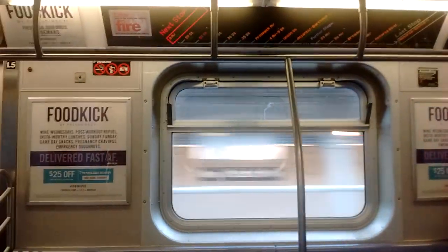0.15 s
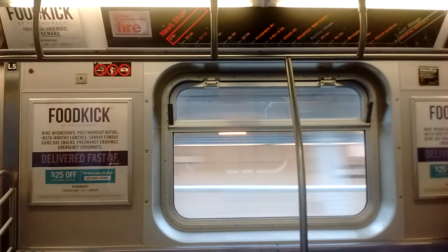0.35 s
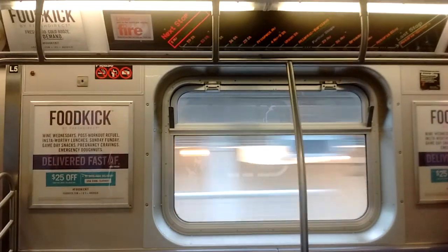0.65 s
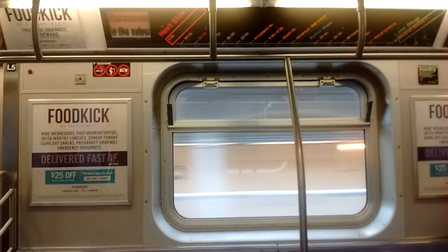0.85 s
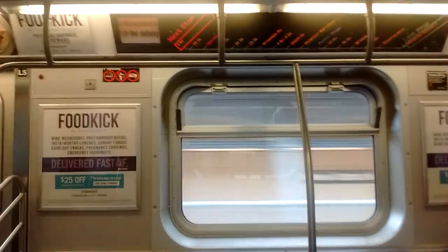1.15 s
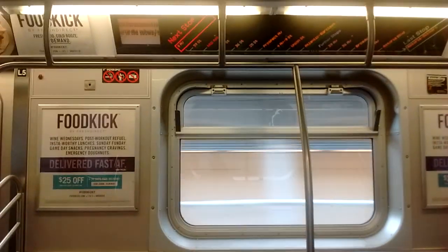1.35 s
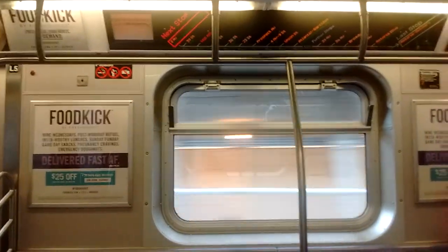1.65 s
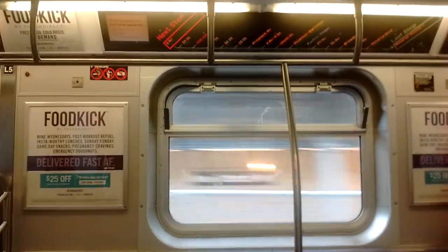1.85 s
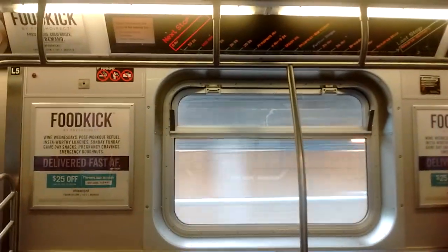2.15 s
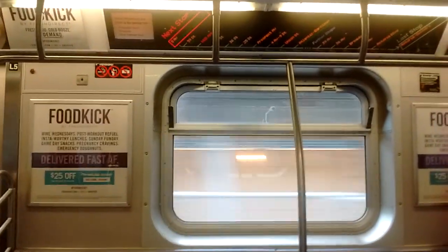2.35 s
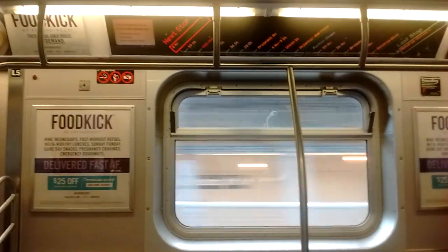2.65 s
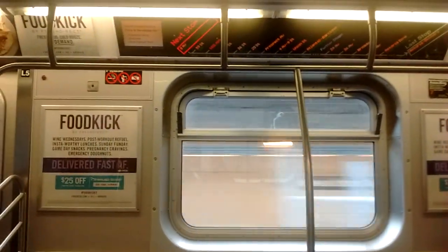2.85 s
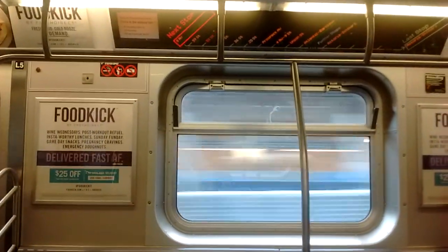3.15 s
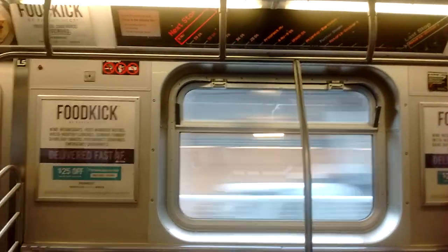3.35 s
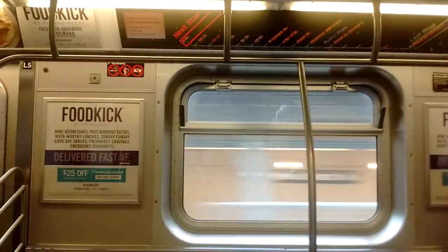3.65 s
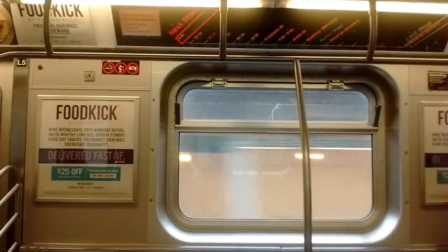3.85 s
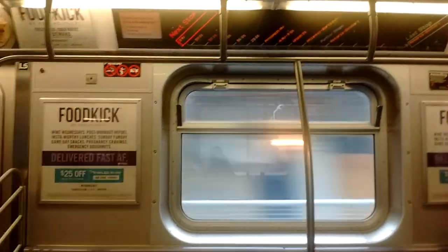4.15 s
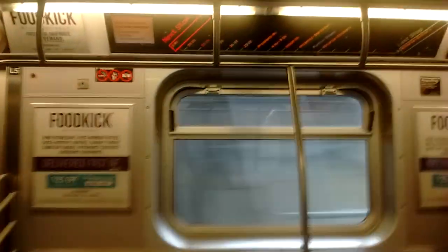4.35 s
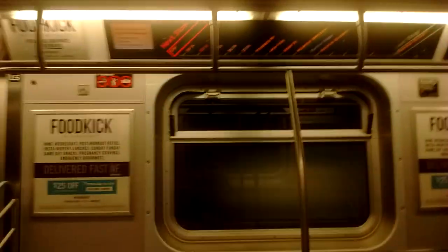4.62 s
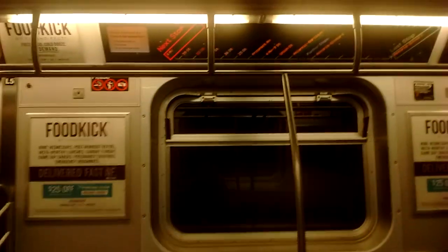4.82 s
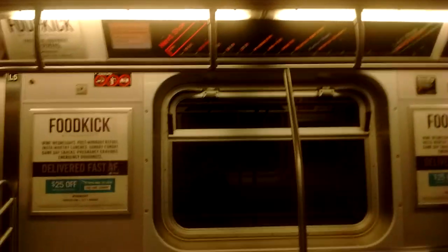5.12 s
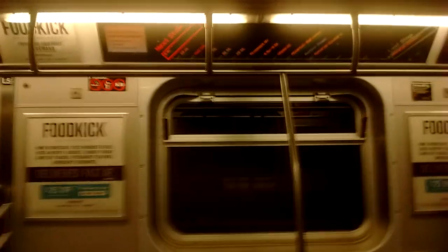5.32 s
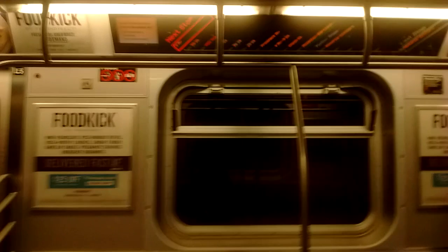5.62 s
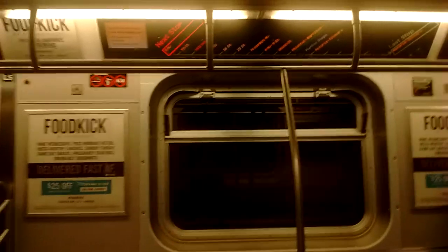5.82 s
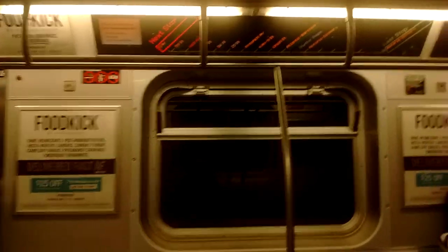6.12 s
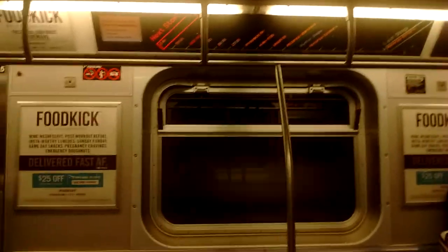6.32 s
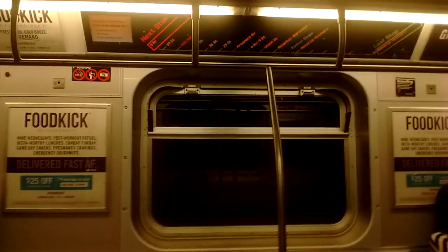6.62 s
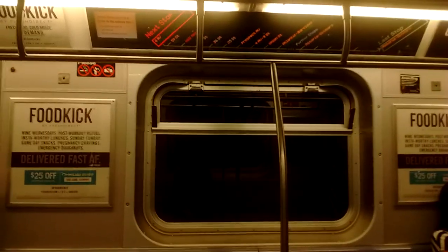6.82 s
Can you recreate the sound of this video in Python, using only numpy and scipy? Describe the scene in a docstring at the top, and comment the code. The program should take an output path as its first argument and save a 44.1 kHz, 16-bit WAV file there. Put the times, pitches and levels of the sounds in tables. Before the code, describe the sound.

Inside a fast subway car, deep floor rumble and broad wheel roar run without pause, with air hissing past the door seals. A low motor hum pulses early, then fades. Faint steel scrapes, a chirp and one tiny thin squeal pass. After the station, the tunnel walls close in and the roar grows brighter and rougher, with rapid puffs at rail joints. Handheld stereo microphone inside the cabin.

```python
"""Inside a fast subway car

The car runs past a station, then the tunnel walls close in.
Shaped noise makes the wheel roar, floor rumble, panel drone, wall echo and rushing air; the motor hums.
Noise bursts puff at rail joints, bands of noise chirp, swell and sing, gritty noise scrapes, one tone squeals.
Two microphone ports each also hear the other side late; the right channel is inverted."""
import sys
import numpy as np
from scipy import signal
from scipy.fft import rfft, irfft, next_fast_len
from scipy.io import wavfile

SR = 44100
rng = np.random.default_rng(int(sys.argv[2]) if len(sys.argv) > 2 else 0)


def wrap_up_sound(samples):
    """Save the sound to the file named by the first command line argument, as 16-bit audio."""
    columns = np.atleast_2d(samples).T
    # keep every value between -1 and 1, then stretch to whole-number steps
    tamed = np.clip(columns, -1, 1)
    steps = np.round(tamed * 32767).astype(np.int16)
    wavfile.write(sys.argv[1], SR, steps)


def makeup_ratio(level_db):
    """Linear amplitude ratio for a level in decibels (20 dB per factor of ten)."""
    decades = np.asarray(level_db, float) / 20
    return 10 ** decades


N = 307818
SIZE = next_fast_len(N)
HZ = np.maximum(np.fft.rfftfreq(SIZE, 1 / SR), 1)
T = np.arange(N) / SR

# Noise colours; only the shape counts, each layer gets its own level: pitch_hz, level_db_per_hz
ROAR_COLOUR = [(940, 1.5), (1200, -1), (1600, -3), (2000, -3), (2500, -6), (3000, -6), (3600, -10.5),
               (5000, -29), (7000, -32.5)]
RUMBLE_COLOUR = [(22, -31), (31, -20), (41, -1.5), (53, -21), (65, -8), (77, -10), (88, 0.5), (110, -5.5),
                 (121, -3.5), (160, -5), (200, -8), (230, -6.5), (290, -8), (340, -15.5)]
DRONE_COLOUR = [(320, 3), (410, 2.5), (520, 0), (600, -2.5), (780, -7), (900, -7), (960, -23)]
WALL_COLOUR = [(1900, -35), (2400, 6.5), (2800, 6.5), (3300, -6), (4200, -21), (6000, -6)]
RUSH_COLOUR = [(3000, -13), (3500, -1), (3900, 2.5), (4600, -4), (5300, -12.5), (6500, -12), (7000, -13.5)]
SIZZLE_COLOUR = [(7000, 4), (8000, 3), (9200, -1), (10500, -6), (12500, -14.5), (15500, -21)]
# How hard the wheels roll, as roar level before the dips: time_s, level_db
ROLLING_LEVEL = [(0, -31), (.5, -32), (.65, -28.5), (.95, -33), (1.4, -31), (1.9, -30), (2.45, -30.5),
                 (3.0, -31.5), (3.7, -31.5), (3.95, -30.5), (4.4, -30), (4.8, -28.5), (5.1, -30),
                 (5.5, -28.5), (6.2, -28), (6.98, -29)]
# Air past the door seals, as rush level before the dips: time_s, level_db
AIRFLOW_LEVEL = [(0, -41), (.45, -41.5), (.75, -38), (1.0, -38), (1.4, -38.5), (1.95, -40.5), (2.3, -39),
                 (2.95, -41), (3.35, -39.5), (3.7, -40), (4.2, -35.5), (4.6, -39.5), (4.9, -41.5),
                 (5.3, -45.5), (5.7, -43.5), (6.12, -42.5), (6.7, -46), (6.98, -43.5)]
# Roar and rush dip briefly together: middle_s, depth_db
LEVEL_DIPS = [(1.57, 2.5), (2.08, 4), (2.66, 2), (3.3, 1), (5.0, 2), (5.78, 1), (6.62, 0.5)]
# How close the tunnel walls are: time_s, closeness (0 open to 1 close)
WALL_CLOSENESS = [(0, 0.053), (4.45, 0.099), (4.75, 0.88), (5.3, 0.8), (6.98, 0.96)]
# Wheel resonance singing in the roar, before its flutter: time_s, level_db
SINGING_LEVEL = [(0, -36), (1.4, -35), (2.4, -34), (3.5, -38), (3.85, -34), (4.3, -29.5), (4.6, -32.5),
                 (4.88, -27), (5.1, -31.5), (5.3, -37), (5.47, -26.5), (5.7, -29.5), (5.82, -35),
                 (5.95, -30), (6.4, -28), (6.6, -38), (6.85, -39), (6.98, -27)]
# Wheels over joints and gaps; the bell is set before a tilt to the bass:
# start_s, peak_level_db, bell_middle_hz, bell_width_octaves, fall_by_60_db_s
JOINT_PUFFS = [(.45, -40, 5000, 1.5, 0.46), (2.58, -35.5, 3480, 1.8, 0.2), (3.76, -28, 1300, 2.8, 1.02),
               (3.83, -50, 7000, 1.5, .25), (4.15, -46.5, 6500, 2, 0.36), (5.29, -32, 1700, 1.8, .4),
               (5.39, -30.5, 1800, 1.6, 0.44), (5.49, -29, 1510, 2.1, 0.35), (5.63, -31, 1705, 1.8, .2),
               (5.76, -24.5, 1920, 1.4, .12), (5.805, -31, 1900, .7, 0.22), (5.855, -34, 1950, 0.76, 0.15),
               (5.94, -32, 1500, 2.1, 0.37), (6.111, -27.5, 1760, 1.6, 0.36), (6.4, -37, 1690, 2.6, .3),
               (6.83, -27.5, 2200, 1.7, 0.3), (6.92, -32, 1800, 1.5, .4)]
# Bands of noise: short chirps, slow swells of the air rush, a rising surge; None means no glide:
# middle_s, half_length_s, pitch_hz, width_hz, peak_level_db, glide_hz_per_s
NOISE_BANDS = [(.5, .04, 9500, 900, -58, None), (0.85, 0.058, 3830, 720, -32, -300),
               (0.86, .045, 7550, 120, -64, None), (1.13, .06, 6440, 500, -45, 1498),
               (3.81, 0.599, 4520, 760, -44.5, None), (0.42, 0.65, 3680, 400, -42.5, None),
               (4.13, 0.53, 6500, 900, -50, None), (6.11, 0.045, 8100, 400, -53, None),
               (3.79, .04, 980, 160, -28.5, 3500.5), (3.87, 0.082, 1450, 850, -28.5, 1500.5),
               (3.845, .055, 770, 200, -27, 299.5)]
# Scrapes of steel on steel, before their grit: middle_s, half_length_s, peak_level_db
STEEL_SCRAPES = [(.49, 0.032, -57), (.62, 0.11, -59), (.79, .04, -54), (0.866, 0.052, -47), (.96, .05, -52),
                 (1.06, .04, -53), (1.139, 0.05, -51), (1.269, .05, -56), (3.98, .1, -58), (4.2, .08, -56),
                 (4.4, .12, -59)]
# Motor hum, before flutter and side balance: time_s, level_db
HUM_LEVEL = [(0, -31), (.1, -15), (.25, -22), (.36, -43), (.6, -38), (.68, -16), (.82, -28), (.92, -16),
             (1.1, -27), (1.25, -16.5), (1.42, -20.5), (1.58, -28), (1.83, -20), (2.1, -28), (2.22, -18),
             (2.48, -21), (2.62, -28), (2.76, -18), (2.88, -30), (3.25, -25), (6.98, -41)]
# Motor hum, before its wobble: time_s, pitch_hz
HUM_PITCH_CURVE = [(0, 161), (.08, 157), (.27, 128), (.65, 148), (.85, 138.1), (1.3, 141.2), (2.3, 140),
                   (6.98, 139.4)]
# How noise arrives: pitch_hz, likeness of the two sides (-1 to 1), left_minus_right_db
SIDE_BALANCE = [(40, 0.88, 6.5), (147, 0.99, 6), (396, 0.92, 3), (720, 0.7, -1), (1056, 0.25, 2),
                (1600, 0.13, 3.5), (2650, -0.37, -1), (3250, 0.099, 0), (4160, 0.1, -6.5),
                (5000, -0.075, 5), (6130, -0.061, -6), (8440, -0.037, 1), (12400, -0.037, 2.5)]

PORT_LAG_SAMPLES = 14


def rms_one(x):
    """Scale to an average strength (rms) of 1."""
    return x / np.sqrt(np.mean(x ** 2) + 1e-20)


def in_time(rows):
    """Draw a time curve with one value per sample."""
    seconds, values = np.transpose(rows)
    return np.interp(T, seconds, values)


def at_hz(points, column=1):
    """Read a spectrum table at every frequency bin."""
    points = np.array(points)
    return np.interp(np.log(HZ), np.log(points[:, 0]), points[:, column])


def drift(rate_hz):
    """Random wandering: noise made once per 40 samples, smoothed by two low-passes; spread 1."""
    r = np.exp(-80 * np.pi * rate_hz / SR)
    coarse = rng.standard_normal(N // 40 + 2002)
    slow = signal.lfilter([1], [1, -2 * r, r * r], coarse)[2000:]  # skip the settling-in
    return np.interp(np.arange(N) / 40, np.arange(len(slow)), rms_one(slow - slow.mean()))


def two_sided_white():
    """White noise spectra for both sides: alike in the bass, mostly unrelated higher up."""
    shared, apart = rfft(rng.standard_normal((2, SIZE)))
    alike = np.clip(at_hz(SIDE_BALANCE), -.999, .999)
    lean = makeup_ratio(at_hz(SIDE_BALANCE, column=2) / 2)
    shared = np.sqrt(1 + alike) * shared
    apart = np.sqrt(1 - alike) * apart
    return np.array([(shared + apart) * lean, (shared - apart) / lean])


def patchy_noise(white, colour, jolt, patchy_db, together, rate_hz):
    """Noise in overlapping third-octave bands; each flickers, partly in step with the car's jolting."""
    low, high = np.log2(colour[0][0]), np.log2(colour[-1][0])
    count = int(np.ceil(3 * (high - low)))
    place = (np.log2(HZ) - low) / (high - low) * count
    shaped = white * makeup_ratio(at_hz(colour))
    out = 0
    for k in range(count):
        # smooth steps that add up to one across neighbouring bands
        band = np.clip(2 * (place - k) + .5, 0, 1) - np.clip(2 * (place - k - 1) + .5, 0, 1)
        flicker_db = patchy_db * (together * jolt + drift(rate_hz))
        out = out + irfft(shaped * band, SIZE)[:, :N] * makeup_ratio(flicker_db)
    return rms_one(out)


def bell_noise(white, hz, octaves):
    """Noise through a bell on a log pitch scale, then tilted to the bass; rms 1."""
    bell = np.exp(-(2 * np.log2(HZ / hz) / octaves) ** 2)
    return rms_one(irfft(white * bell / HZ, SIZE)[:, :N])


def resonant(white, hz, width_hz):
    """Noise through one resonance, as wide as given at half strength; rms 1."""
    return rms_one(irfft(white / (1 + (2 * (HZ - hz) / width_hz) ** 2), SIZE)[:, :N])


def shifted(x, by_hz):
    """Move every frequency up by a running amount."""
    turning = np.exp(2j * np.pi * np.cumsum(by_hz) / SR)
    return np.real(signal.hilbert(x, SIZE)[:, :N] * turning)


def from_right(white, own, share):
    """Sound on the right also reaches the left side, late and weaker."""
    late = white[1] * np.exp(-2j * np.pi * HZ * PORT_LAG_SAMPLES / SR)
    return np.array([own * white[0] + share * late, white[1]])


def rolling():
    """Rolling wheels and rushing air, linked by shared noise, level swings and jolting."""
    dip_half_s = 0.062
    dip_db = sum(depth_db * np.exp(-((T - s) / dip_half_s) ** 2) for s, depth_db in LEVEL_DIPS)
    roar_db = in_time(ROLLING_LEVEL) - dip_db
    rush_db = in_time(AIRFLOW_LEVEL) - dip_db
    close = np.clip(in_time(WALL_CLOSENESS), 0, 1)
    roll_swing_db = roar_db - roar_db.mean()
    flow_swing_db = rush_db - rush_db.mean()
    wheels, air, jolt = two_sided_white(), two_sided_white(), drift(11.7)
    return (roar(wheels, jolt, roar_db)
            + rumble(wheels, jolt, roll_swing_db, close)
            + drone(wheels, jolt, roll_swing_db, close)
            + wall_echo(jolt, roar_db, close)
            + rush(air, jolt, rush_db)
            + sizzle(air, jolt, flow_swing_db, close))


def roar(wheels, jolt, roar_db):
    """Rough wheels on rails give a broad, flickering noise."""
    return makeup_ratio(roar_db) * patchy_noise(wheels, ROAR_COLOUR, jolt, patchy_db=0.5, together=1.7, rate_hz=18.0)


def rumble(wheels, jolt, roll_swing_db, close):
    """The wheels shake the floor: deep noise following part of the roar's swing."""
    level_db = -18.5 + 0.43 * roll_swing_db - 1.26 * close  # a little weaker between close walls
    return makeup_ratio(level_db) * patchy_noise(wheels, RUMBLE_COLOUR, jolt, patchy_db=1.16, together=0.078, rate_hz=6.9)


def drone(wheels, jolt, roll_swing_db, close):
    """The wheels shake the panels: mid-pitched noise following most of the roar's swing."""
    level_db = -25 + 0.71 * roll_swing_db + 1 * close
    return makeup_ratio(level_db) * patchy_noise(wheels, DRONE_COLOUR, jolt, patchy_db=0.5, together=0.52, rate_hz=3.3)


def wall_echo(jolt, roar_db, close):
    """Close walls throw wheel noise back: separate noise below the roar, scaled by closeness."""
    noise = patchy_noise(two_sided_white(), WALL_COLOUR, jolt, patchy_db=-1.0, together=0.7, rate_hz=13.0)
    return close * makeup_ratio(roar_db - 9.5) * noise


def rush(air, jolt, rush_db):
    """Air tears past the right door seals as bright noise."""
    seals = from_right(air, own=1.0, share=0.069)
    return makeup_ratio(rush_db) * patchy_noise(seals, RUSH_COLOUR, jolt, patchy_db=1.05, together=0.95, rate_hz=7.5)


def sizzle(air, jolt, flow_swing_db, close):
    """The finest hiss follows the rush and grows as the walls close in."""
    level_db = -60 + 0.84 * flow_swing_db + 6 * close
    return makeup_ratio(level_db) * patchy_noise(air, SIZZLE_COLOUR, jolt, patchy_db=1.07, together=0.54, rate_hz=8.5)


def singing():
    """Noise through one broad wheel resonance, wandering in pitch, coming and going."""
    band = resonant(two_sided_white(), hz=772, width_hz=155)
    wander_hz, flutter_db = 16 * drift(3.01), 2.0 * drift(7.3)
    return makeup_ratio(in_time(SINGING_LEVEL) + flutter_db) * shifted(band, wander_hz)


def puffs():
    """Each joint sends a burst of noise that swells quickly and dies in the car."""
    white, out = two_sided_white(), 0
    for s, db, hz, octaves, fall_s in JOINT_PUFFS:
        after = np.maximum(T - s, 0)
        rise_s = 0.042 * fall_s ** 1.86  # shorter puffs rise faster
        shape = (1 - np.exp(-after / rise_s)) * makeup_ratio(-60 * after / fall_s)
        out = out + makeup_ratio(db) * shape / shape.max() * bell_noise(white, hz, octaves)
    return out


def chirps_and_swells():
    """Bands of noise: short chirps, slow swells of the air rush, a rising surge; some glide."""
    white, out = two_sided_white(), 0
    for s, half_s, hz, width_hz, db, glide in NOISE_BANDS:
        band = resonant(white, hz, width_hz)
        if glide:
            band = shifted(band, glide * np.clip(T - s, -2 * half_s, 2 * half_s))
        out = out + makeup_ratio(db) * np.exp(-((T - s) / half_s) ** 2) * band
    return out


def scrapes():
    """Steel on steel: bright noise broken up by fast uneven contact."""
    bright = bell_noise(two_sided_white(), hz=8300, octaves=1.5)
    contact = sum(makeup_ratio(db) * np.exp(-((T - s) / half_s) ** 2) for s, half_s, db in STEEL_SCRAPES)
    grit_db = 2.5 * drift(70.0)
    return contact * bright * makeup_ratio(grit_db)


def squeal():
    """A flange holds one clean, thin pitch for a moment, weaker past its middle."""
    start_s, length_s, edge_s, left_late_s = 1.672, .108, .006, .000115
    pitch_hz, level_db, sag_db = 4355, -42, 6
    after = T - start_s
    held = np.clip(np.minimum(after, length_s - after) / edge_s, 0, 1)
    sag = np.sin(np.pi * np.clip(after / length_s, 0, 1) ** 1.5) ** 2
    tone = np.sin(2 * np.pi * pitch_hz * (T - [[left_late_s], [0]]))
    return held * makeup_ratio(level_db - sag_db * sag) * tone


def hum():
    """The motor's low tone from under the floor, wavering in pitch and strength, stronger on the left."""
    wobble_hz = 3.0 * drift(11.4)
    phase = 2 * np.pi * np.cumsum(in_time(HUM_PITCH_CURVE) + wobble_hz) / SR
    level = makeup_ratio(in_time(HUM_LEVEL) + 2.2 * drift(8.5))
    side_db = [[2.2], [-2.2]]  # left, right
    return np.sqrt(2) * level * np.sin(phase) * makeup_ratio(side_db)


def scene():
    """All sources inside the car."""
    return rolling() + singing() + puffs() + chirps_and_swells() + scrapes() + squeal() + hum()


def low_pass(x):
    """Removes everything above the highest recorded frequency."""
    return signal.sosfilt(signal.butter(12, 15390, fs=SR, output="sos"), x)


def record(dry):
    """Each port hears the far side a fraction of a millisecond late; right is inverted, peaks are rounded."""
    # above 9630 Hz the sides blend less, with a different lag
    treble = HZ > 9630
    lag_samples = PORT_LAG_SAMPLES + (19.5 - PORT_LAG_SAMPLES) * treble
    blend = makeup_ratio(-11 * treble) * np.exp(-2j * np.pi * HZ * lag_samples / SR)
    late = irfft(rfft(dry[::-1], SIZE) * blend, SIZE)[:, :N]
    ports = (dry + .65 * late) * [[1], [-1]]
    knee, room = .6, .37  # rounding starts at the knee, with this much room above it
    over = np.maximum(np.abs(ports) - knee, 0)
    rounded = ports - np.sign(ports) * (over - room * np.tanh(over / room))
    return low_pass(rounded)


dry = scene()
out = record(dry)
wrap_up_sound(out)
```